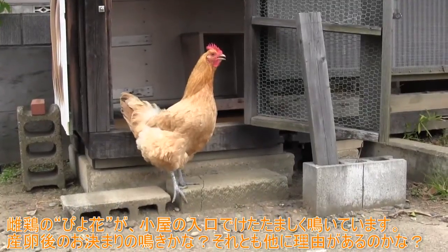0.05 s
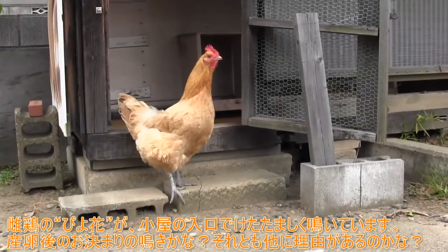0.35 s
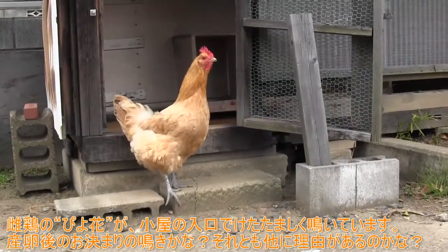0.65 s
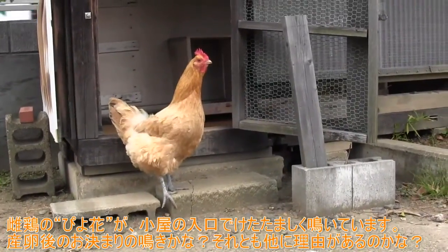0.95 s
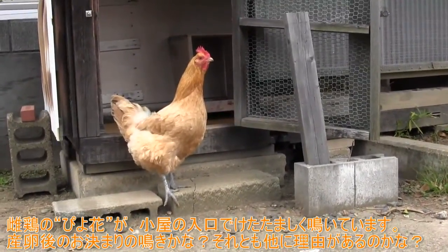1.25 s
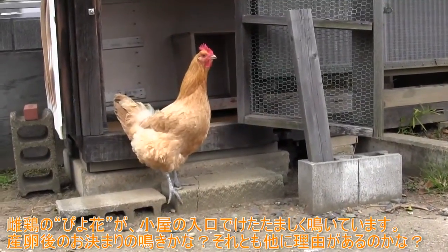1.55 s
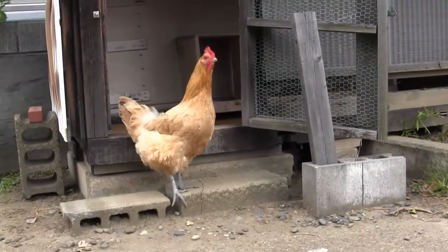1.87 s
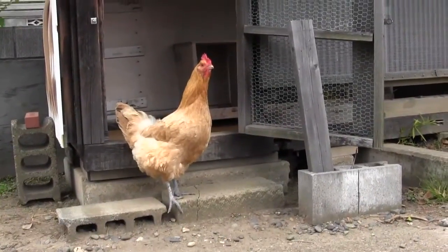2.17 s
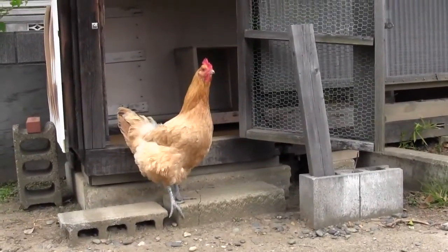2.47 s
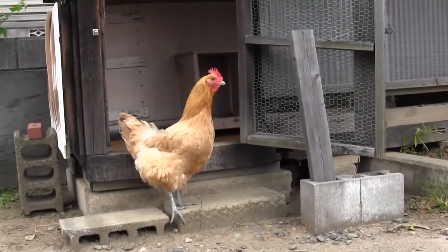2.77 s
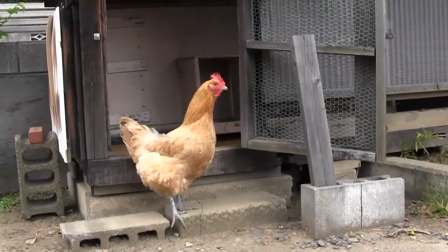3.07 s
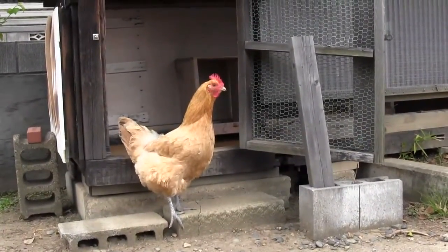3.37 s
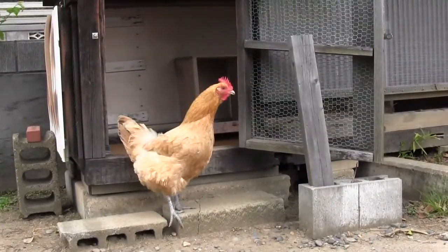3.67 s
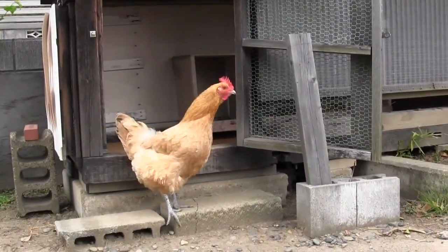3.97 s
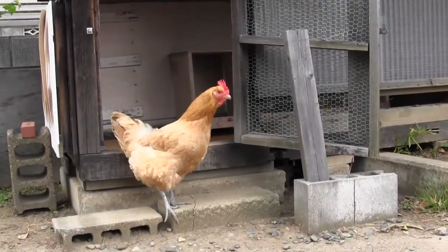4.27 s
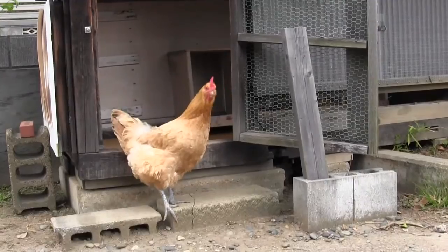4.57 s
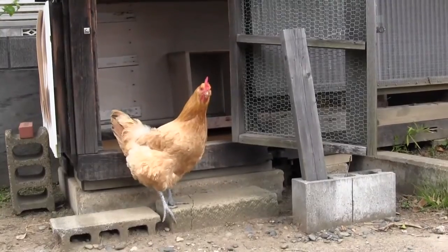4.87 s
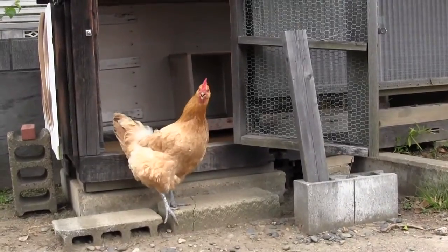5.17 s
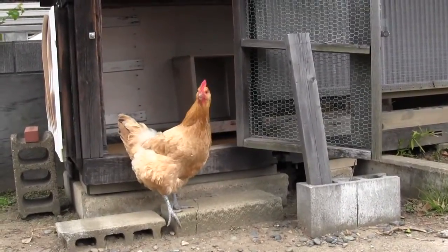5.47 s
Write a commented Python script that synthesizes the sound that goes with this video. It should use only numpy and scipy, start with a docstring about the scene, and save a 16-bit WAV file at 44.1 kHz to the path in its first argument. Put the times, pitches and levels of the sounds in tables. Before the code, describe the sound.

Close, raspy hen clucks and a couple of squawks in a quiet garden, with soft puffs of wind buffeting the microphone.

```python
"""A quiet garden, the microphone facing a hen close by, in front of her wooden coop. She opens with a cluck
and a long, harsh squawk, then runs on in short clucks, each a low rattle that snaps to a higher pitch.
Pulses from her syrinx ring her throat and beak; the coop and a wall throw the sound back. From about
halfway, puffs of wind buffet the microphone harder and a small bird chirps far off.
Near the end come a second squawk, a last cluck and one more distant chirp."""
import sys
import numpy as np
from scipy import signal
from scipy.fft import rfft, irfft
from scipy.io import wavfile
from scipy.ndimage import uniform_filter1d

SR = 44100
rng = np.random.default_rng(int(sys.argv[2]) if len(sys.argv) > 2 else 0)


def log_audio(samples):
    """Write samples as a 16-bit WAV file to the path given in sys.argv[1]."""
    # one column per channel
    frames = np.atleast_2d(samples).T
    # limit to full scale, then quantise
    limited = np.clip(frames, -1, 1)
    pcm = np.round(limited * 32767).astype(np.int16)
    wavfile.write(sys.argv[1], SR, pcm)


N = 252693
TIME = np.arange(N) / SR

# the hen's clucks; mouth_factor scales the throat's resonance frequencies:
# middle_s, level_db, pitch_hz, mouth_factor, second_resonance_db, treble_db
HEN_CLUCKS = [(.062, -10, 390, 1.035, -.5, -3.5), (.476, -8, 469.4, .971, -0.5, -1.5),
              (.778, -9, 482.3, .983, .5, 0), (1.620, -9, 494, 1, -6.5, -6),
              (1.874, -11.5, 399.3, 0.98, -1, -2.5), (2.151, -10, 502, 0.98, -9, -8.5),
              (2.399, -10.5, 404.3, 1.009, 0.5, -.5), (2.672, -10, 408.5, 1.02, 0, -1),
              (2.938, -9.5, 424.3, 1.03, 2.5, -.5), (3.228, -7.5, 445, 1.019, -0.5, -6.5),
              (3.497, -9.5, 425, 1.04, 3.5, 1), (3.770, -8.5, 430.5, 1.017, -2, 0.5),
              (4.100, -9.5, 404.8, 0.975, -5, 0), (4.326, -8.5, 421.7, 1.031, -7.5, -2.5),
              (4.564, -10.5, 410.3, .997, -11.5, -0.5), (4.796, -11, 412.4, 1.012, -1.5, 1.5),
              (5.120, -8.5, 420, 1.026, 2.5, 0), (5.649, -9, 422.2, 1.024, 3.5, .5)]
# her squawks: start_s, time_to_flip_s, release_s, level_db, cry_boost_db, rasp_hz, flip_hz,
# roughness_share, second_resonance_db, between_resonance_db, treble_db
HEN_SQUAWKS = [(.129, 0.12, .046, -9.8, 1.4, 348, 535, .7, -1, -0.5, -4.5),
               (5.197, 0.16, .055, -11.5, 4, 357.7, 550, .52, -2, 3, -.5)]
# throat and beak, half open; first resonance, second, one between them, then the treble:
# centre_hz, width_hz, level_db
CLUCK_RESONANCES = [(938.6, 285, 1), (1973, 186, -6), (1380, 540, -19.5), (3231.5, 445, -13.5),
                    (4170, 360, -25.5), (5440, 266, -20.5), (6590, 330, -28), (7920, 950, -30),
                    (11100, 3400, -36.5)]
# the same, wide open: centre_hz, width_hz, level_db
SQUAWK_RESONANCES = [(1010, 288, 0.5), (1896, 250, -6.5), (1445, 100, -5.5), (3140, 270, -6),
                     (4250, 680, -16.5), (5600, 460, -22.5), (6500, 320, -20.5), (7540, 450, -21),
                     (9980, 3800, -29.5)]
# first reflections at the microphone: delay_s, level_db
YARD_ECHOES = [(.0034, -21.5), (.0093, -20.5), (.019, -19)]
# how long the yard rings: frequency_hz, t60_s
YARD_DECAY = [(200, 0.01), (900, 0.47), (2000, 0.52), (5000, 0.5), (14000, 0.45)]
# colour of that ring: frequency_hz, level_db
YARD_SPECTRUM = [(200, 3), (900, -14.5), (2000, -20), (4000, -17.5), (14000, -24)]
# wind on the microphone: time_s, level_db
WIND_LEVEL = [(0, -36), (.7, -54), (1.05, -42), (1.35, -53), (2.42, -37), (2.54, -45), (2.66, -27.5),
              (2.84, -38), (3.03, -30), (3.3, -29), (3.44, -43), (3.55, -26.5), (3.85, -27.5), (3.95, -33),
              (4.18, -25.5), (4.28, -35), (4.43, -27), (4.62, -26), (4.68, -39), (4.76, -28), (4.97, -52),
              (5.14, -30), (5.3, -43), (5.52, -28), (5.72, -43)]
# colour of the wind: frequency_hz, relative_density_db
WIND_SPECTRUM = [(30, -47), (70, -22), (130, -5.5), (260, 0), (470, -4), (700, -15), (1500, -26),
                 (4000, -56), (12000, -87)]
# sharp buffets on the microphone: middle_s, level_db, half_length_s, brightness_db
WIND_BUFFETS = [(0.999, -32.5, .012, 1), (2.743, -21, .01, -16), (2.896, -21.5, .005, 3),
                (3.194, -21.5, .0128, 1), (3.66, -23.5, .008, 0), (4.399, -15.5, 0.0048, 3.5),
                (4.417, -19.5, .02, 2), (4.518, -15.5, .018, 22), (4.606, -19, .012, 16),
                (4.645, -15, .012, 9), (5.194, -19, .008, 0), (5.49, -24.5, .006, 5)]
# the distant bird: start_s, level_db, start_hz, end_hz, length_s
BIRD_CHIRPS = [(2.782, -43, 3720, 4456, .024), (5.702, -43.5, 3700, 4490, 0.0373)]
# colour of the garden air: frequency_hz, relative_density_db
GARDEN_SPECTRUM = [(30, -24.5), (80, -12), (160, 0.5), (300, 0.5), (560, 0), (1000, -2.5), (2000, -7),
                   (4000, -19), (8000, -28.5), (15000, -33.5)]
# level of the garden air: time_s, level_db
GARDEN_LEVEL = [(0, -40.5), (1.5, -39), (5, -45.5)]

# a cluck lasts a set number of cycles of its pitch, so higher ones are shorter
ATTACK_CYCLES, HOLD_CYCLES, RELEASE_CYCLES, MIDDLE_CYCLES = 10, 9.43, 9.4, 15.03
ATTACK_CURVE = .9  # under 1 the swell comes late
ONSET_DB, NOTE_DB, SHUT_DB = -26.5, -.72, -22.5
LEAP_CYCLES, LEAP_WIDTH_CYCLES = 11.8, .6  # when the rattle leaps to the note, and how fast
RATTLE_PITCH, RATTLE_CLIMB, CLUCK_SAG = .42, .27, .07  # shares of the note's pitch
RATTLE_ROUGH, SHUT_ROUGH = .22, .44  # roughness added before and after the note
RATTLE_DULL_DB, SHUT_DULL_DB = -8.5, -11  # upper resonances before and after the note
FIRST_ROUGH, CLEARING_PER_S = .582, .07  # the voice clears as the run goes on

# a squawk opens with a clear, loud cry, the beak wide
SQUAWK_ATTACK_S, SQUAWK_ONSET_DB, SQUAWK_END_DB = .0076, -24, -18
CRY_S, CRY_FADE_S, CRY_TREBLE_DB = .0219, .003, -7.5
CRY_ROUGH = .416  # share of the rasp's roughness
GAPE, GAPE_S, GAPE_FADE_S = .082, .037, .0055  # extra mouth opening, how long it is held, how fast it goes
RING_AT_S, RING_S, RING_DB = .022, .01, 10.5  # the second resonance flares in the cry
CATCH_AT_S, CATCH_S, CATCH_DB = .037, .012, -3.5  # the voice catches as it breaks into the rasp
RASP_SAG_HZ_PER_S, RASP_MOUTH = 170, .985  # the rasp sinks in pitch, the beak a little narrower
# it ends with a flip to a high, clear note that slides down as the beak shuts
FLIP_S, FLIP_HOLD_S, FLIP_ROUGH, FLIP_GAPE = .00185, .012, .26, .068
FLIP_DB, FLIP_SECOND_DB, FLIP_TREBLE_DB = 1.6, -9, -3.5
END_SHUT, END_SAG, END_TREBLE_DB = .15, .22, -6
END_ROUGH, END_SECOND_DB = .6, 3  # the dying note frays, and its second resonance returns


def cluck(middle_s, db, pitch_hz, mouth, second_db, treble_db):
    """A dull rattle swells, leaps to a bright, pitched note and shuts. Returns start time and sound."""
    cycles = np.arange(0, ATTACK_CYCLES + HOLD_CYCLES + RELEASE_CYCLES, pitch_hz / SR)
    opening = ramp(cycles, 0, ATTACK_CYCLES)
    closing = ramp(cycles, ATTACK_CYCLES + HOLD_CYCLES, RELEASE_CYCLES)
    note = step(cycles, LEAP_CYCLES, LEAP_WIDTH_CYCLES)
    rattle = 1 - note
    level_db = db + ONSET_DB * (1 - opening) ** ATTACK_CURVE + NOTE_DB * note + SHUT_DB * closing
    hz = pitch_hz * (rattle * (RATTLE_PITCH + RATTLE_CLIMB * opening) + note * (1 - CLUCK_SAG * closing))
    rough = FIRST_ROUGH - CLEARING_PER_S * middle_s + RATTLE_ROUGH * rattle + SHUT_ROUGH * closing
    dull_db = RATTLE_DULL_DB * rattle + SHUT_DULL_DB * closing
    mouth = np.full(len(hz), mouth)
    sound = voice(CLUCK_RESONANCES, level_db, hz, rough, mouth, second_db + dull_db, treble_db + dull_db)
    return middle_s - MIDDLE_CYCLES / pitch_hz, sound


def squawk(start_s, flip_at_s, release_s, db, cry_db, rasp_hz, flip_hz, rasp_rough,
           second_db, between_db, treble_db):
    """A clear cry breaks into a sagging rasp, then flips to a high note that falls and fades."""
    t = np.arange(0, flip_at_s + release_s, 1 / SR)
    cry = 1 - step(t, CRY_S, CRY_FADE_S)
    gaping = 1 - step(t, GAPE_S, GAPE_FADE_S)
    ring = np.exp(-((t - RING_AT_S) / RING_S) ** 2)
    catch = np.exp(-((t - CATCH_AT_S) / CATCH_S) ** 2)
    flip = step(t, flip_at_s, FLIP_S)
    closing = ramp(t, flip_at_s, release_s)
    note = flip * (1 - closing)
    attack_db = SQUAWK_ONSET_DB * (1 - ramp(t, 0, SQUAWK_ATTACK_S))
    fade_db = SQUAWK_END_DB * ramp(t, flip_at_s + FLIP_HOLD_S, release_s - FLIP_HOLD_S)
    level_db = db + attack_db + fade_db + cry_db * cry + CATCH_DB * catch + FLIP_DB * flip
    hz = (1 - flip) * (rasp_hz - RASP_SAG_HZ_PER_S * t) + flip * flip_hz * (1 - END_SAG * closing)
    rough = rasp_rough * (1 - cry - flip + CRY_ROUGH * cry) + FLIP_ROUGH * note + END_ROUGH * closing
    mouth = RASP_MOUTH + GAPE * gaping + FLIP_GAPE * flip - END_SHUT * closing
    second_db = second_db + RING_DB * ring + FLIP_SECOND_DB * note + END_SECOND_DB * closing
    treble_db = treble_db + CRY_TREBLE_DB * cry + FLIP_TREBLE_DB * flip + END_TREBLE_DB * closing
    throat = [(centre, width, peak_db + between_db * (k == 2))
              for k, (centre, width, peak_db) in enumerate(SQUAWK_RESONANCES)]
    return start_s, voice(throat, level_db, hz, rough, mouth, second_db, treble_db)


def voice(throat, level_db, pitch_hz, rough, mouth, second_db, treble_db, jitter=.095, breath=.54,
          puff_cycles=.23, hiss=.65, shimmer_db=4, flutter_db=2.5, throb_db=4, low_cut_hz=740):
    """Uneven pulses of the syrinx, each with a puff of air, ring the throat."""
    count, rough = len(pitch_hz), np.clip(rough, 0, 1)
    cycles = np.cumsum(pitch_hz * (1 + jitter * rough * wander(count, hz=260))) / SR
    samples_from_pulse = ((cycles + .5) % 1 - .5) * SR / pitch_hz
    pulses = np.sinc(.75 * samples_from_pulse) * np.sqrt(SR / pitch_hz)
    pulses *= gain_of(rough * shimmer_db * wander(count, hz=199))
    airflow = np.exp(-(cycles % 1) / (puff_cycles + rough))  # rough folds never quite close
    puffs = evened(airflow * rng.standard_normal(count))
    # about every third pulse is deeper
    throb = throb_db * np.sin(2 * np.pi * cycles / 3 + 2 * wander(count, hz=45))
    sound = np.zeros(count)
    for k, (hz, width, db) in enumerate(throat):
        air = breath * rough + hiss * hz / (hz + 3500) * (k > 2)  # the high resonances are breathier
        drive = (pulses + air * puffs) / np.hypot(1, air)
        lift_db = rough * throb if k == 0 else second_db if k == 1 else treble_db
        trade_db = flutter_db * rough * wander(count, hz=130)  # in a rasp, energy jumps between resonances
        sound += gain_of(db + lift_db + trade_db) * resonate(drive, hz * mouth, width)
    sound = signal.sosfilt(signal.butter(6, low_cut_hz, "high", fs=SR, output="sos"), sound)
    power = uniform_filter1d(sound ** 2, size=500)
    steady = sound / np.sqrt(abs(power) + 1e-12)
    return gain_of(level_db) * steady * signal.windows.tukey(count, .04)  # air pressure sets the loudness


def resonate(x, hz, width_hz):
    """One steep throat resonance of gain 1 that follows the curve hz."""
    carrier = np.exp(2j * np.pi * np.cumsum(hz) / SR)
    lowpass = signal.butter(2, width_hz / 2, fs=SR, output="sos")
    return 2 * (carrier * signal.sosfilt(lowpass, x / carrier)).real


def scatter(call, ring_s=.0012, above_hz=3600):
    """Near surfaces smear each pulse, rippling the treble anew for each call as the head moves."""
    t, count = TIME[:SR // 150], 2 * len(call)
    hz = np.fft.rfftfreq(count, 1 / SR)
    smear = rfft(rng.standard_normal(len(t)) * np.exp(-t / ring_s), count) / np.sqrt(ring_s * SR / 2)
    share = hz ** 4 / (hz ** 4 + above_hz ** 4)
    ripple = np.sqrt(1 - share) + np.sqrt(share) * smear
    ripple /= np.sqrt(uniform_filter1d(abs(ripple) ** 2, size=count // 40))  # broad bands keep their energy
    return irfft(rfft(call, count) * ripple)[:len(call)]


def yard(x, taps_per_s=3000):
    """Ground and coop reflect first; a thin tail follows, ringing for about half a second."""
    build_up = np.clip(TIME[:SR] / .013 - .5, 0, 1)
    taps = rng.standard_normal(SR) * (rng.random(SR) < taps_per_s / SR) * build_up
    hz, t, spectrum = signal.stft(taps, SR, nperseg=256)
    t60 = read(YARD_DECAY, hz)[:, None]
    decay = np.exp(-np.log(1000) * t / t60) * np.sqrt(np.log(1e6) / t60)
    spectrum = spectrum * gain_of(read(YARD_SPECTRUM, hz)[:, None]) * decay
    response = signal.istft(spectrum, SR, nperseg=256)[1] / np.linalg.norm(taps)
    for delay_s, db in YARD_ECHOES:
        add(response, delay_s, gain_of(db) * np.array([.25, .5, .25]))
    return signal.fftconvolve(x, response)[:N]


def wind(trim_db=-1, lumps_db=3.5, bright_hz=1100):
    """Lumpy turbulence right on the microphone; the hardest buffets reach higher up."""
    eddies = evened(rng.standard_normal(N) * gain_of(lumps_db * wander(N, hz=90.2)))
    out = gain_of(follow(WIND_LEVEL) + trim_db) * coloured(eddies, WIND_SPECTRUM)
    for middle_s, db, half_s, bright_db in WIND_BUFFETS:
        count = 2 * int(half_s * SR)
        puff = np.pad(np.hanning(count) * rng.standard_normal(count), count)
        colour = [(hz, level + bright_db * hz ** 2 / (hz ** 2 + bright_hz ** 2))
                  for hz, level in WIND_SPECTRUM]
        add(out, middle_s - 3 * half_s, gain_of(db) * coloured(puff, colour) / np.sqrt(8))
    return out


def bird(waver=.032):
    """A small bird, far from the microphone, gives short rising whistles."""
    out = np.zeros(N)
    for start_s, db, start_hz, end_hz, length_s in BIRD_CHIRPS:
        count = int(length_s * SR)
        hz = np.linspace(start_hz, end_hz, count) * (1 + waver * wander(count, hz=300))
        whistle = np.sin(2 * np.pi * np.cumsum(hz) / SR)
        add(out, start_s, gain_of(db) * 2 * np.hanning(count) * whistle)
    return out


def garden(drift_db=1.6):
    """Behind it all, a soft, slowly drifting wash of far sounds."""
    level_db = follow(GARDEN_LEVEL) + drift_db * wander(N, hz=5.6)
    return gain_of(level_db) * coloured(rng.standard_normal(N), GARDEN_SPECTRUM)


def gain_of(db):
    """Decibels to a factor."""
    return 10 ** (np.asarray(db) / 20)


def evened(x):
    """Scales to rms 1."""
    return x / np.sqrt(np.mean(x ** 2) + 1e-20)


def read(points, hz):
    """Reads a curve on a log-frequency axis."""
    f, value = np.transpose(points)
    return np.interp(np.log(hz + 1), np.log(f + 1), value)


def follow(points):
    """Reads a level curve at every sample of the scene."""
    return np.interp(TIME, *np.transpose(points))


def add(mix, start_s, sound):
    """Mixes a sound in at start_s."""
    part = mix[max(round(start_s * SR), 0):][:len(sound)]
    part += sound[:len(part)]


def coloured(x, points):
    """Gives x a spectrum, at rms 1."""
    hz = np.fft.rfftfreq(len(x), 1 / SR)
    return evened(irfft(rfft(x) * gain_of(read(points, hz)), len(x)))


def wander(count, hz):
    """Random drift, mostly slower than hz, at rms 1."""
    f = np.fft.rfftfreq(count, 1 / SR)
    return evened(irfft(rfft(rng.standard_normal(count)) / (1 + (f / hz) ** 4), count))


def ramp(t, start, length):
    """Rises in a straight line from 0 to 1."""
    return np.clip((t - start) / length, 0, 1)


def step(t, at, width):
    """A smooth switch from 0 to 1."""
    return .5 + .5 * np.tanh((t - at) / (2 * width))


def scene():
    """Everything lies straight ahead of the microphone; only the treble spreads a little."""
    hen = np.zeros(N)
    calls = [cluck(*row) for row in HEN_CLUCKS] + [squawk(*row) for row in HEN_SQUAWKS]
    for start_s, call in calls:
        add(hen, start_s, scatter(call))
    birds = hen + bird()
    mid = birds + yard(birds) + wind() + garden()
    highpass = signal.butter(2, 6500, "high", fs=SR, output="sos")
    side = gain_of(-14) * signal.sosfilt(highpass, np.roll(mid, shift=40))
    return np.array([mid + side, mid - side])


def record(dry, ceiling=.89, edge_hz=15800):
    """The highest peaks are rounded off, then the top of the treble is cut."""
    rounded = dry / (1 + (dry / ceiling) ** 8) ** (1 / 8)
    lowpass = signal.firwin(511, edge_hz, window=("kaiser", 9), fs=SR)
    return signal.oaconvolve(rounded, lowpass[None], "same")


dry = scene()
out = record(dry)
log_audio(out)
```